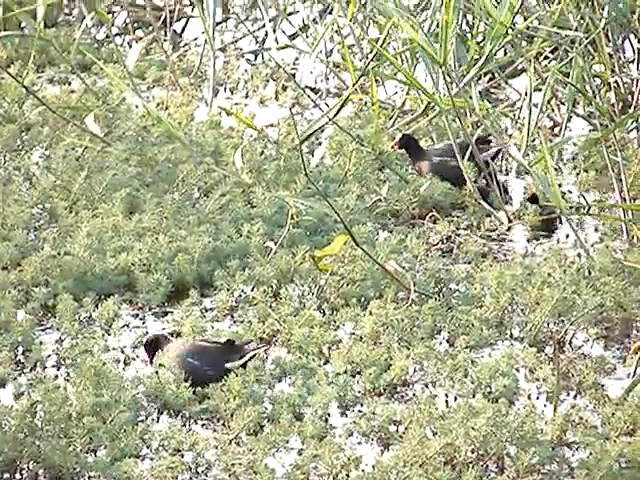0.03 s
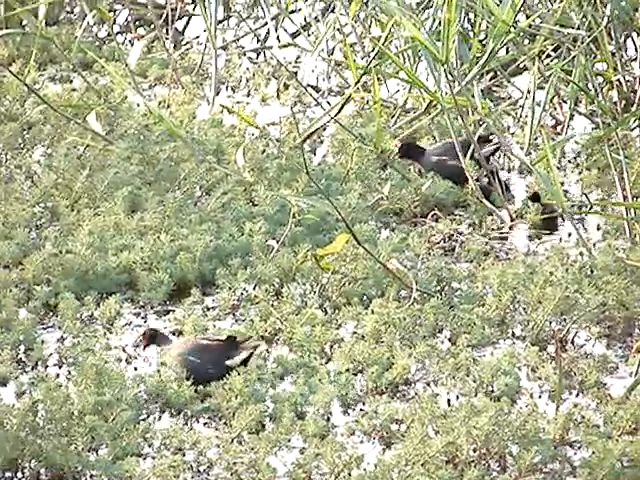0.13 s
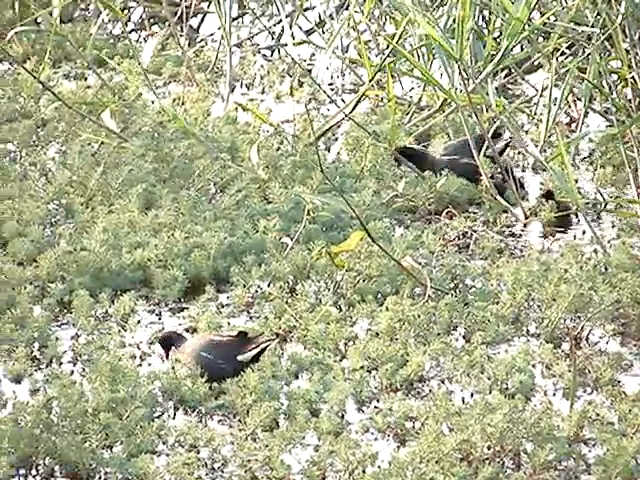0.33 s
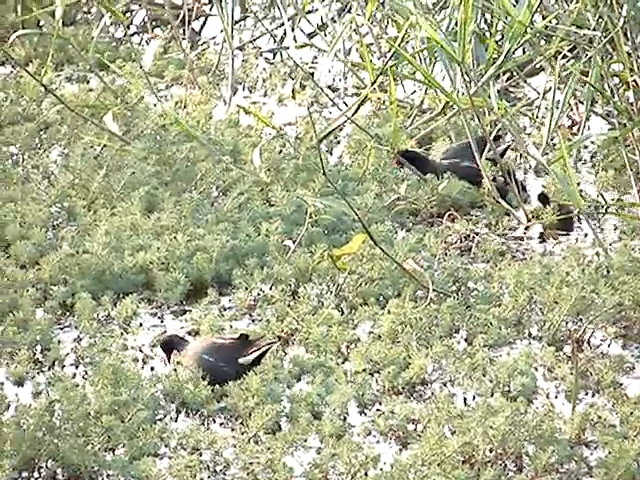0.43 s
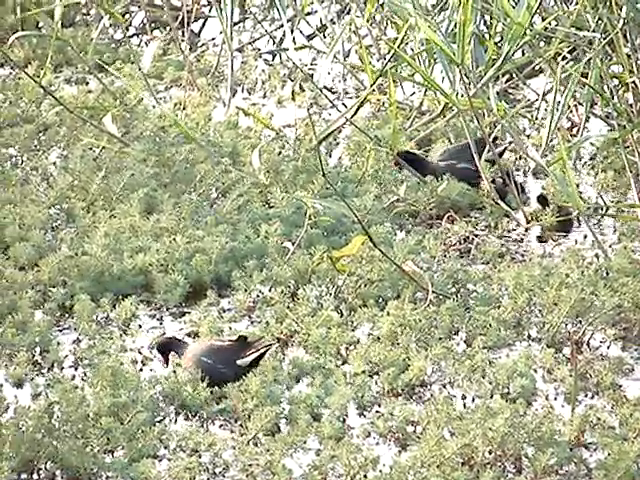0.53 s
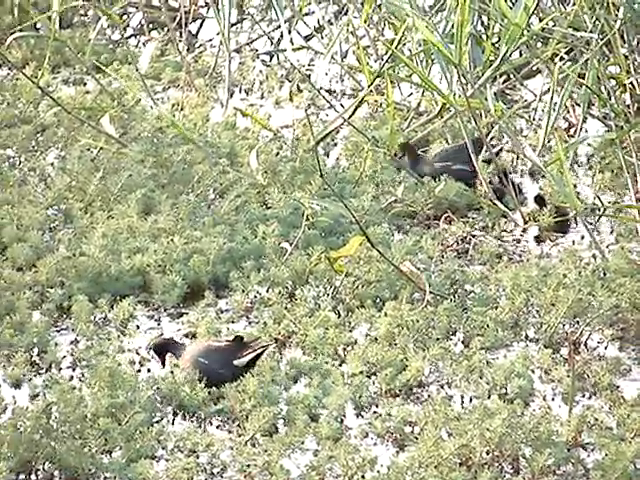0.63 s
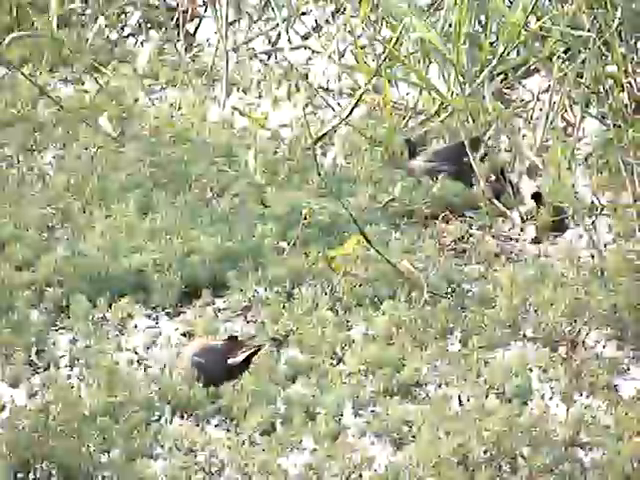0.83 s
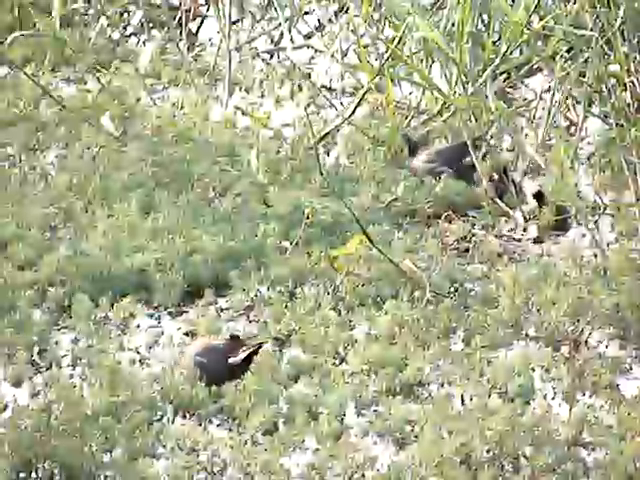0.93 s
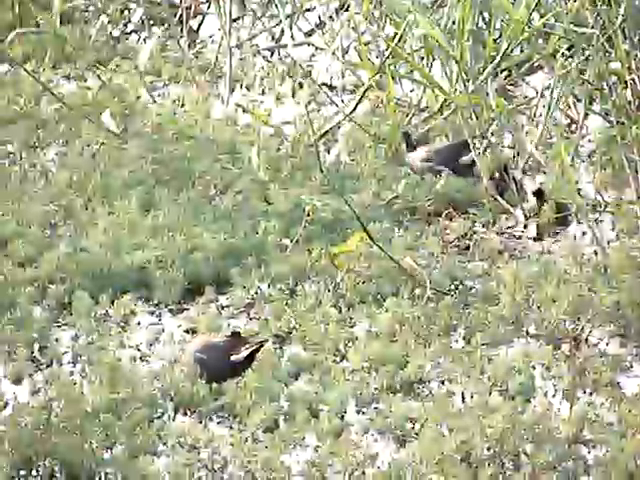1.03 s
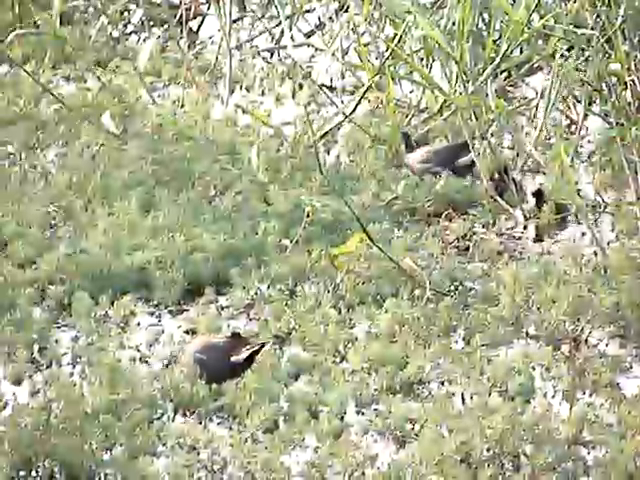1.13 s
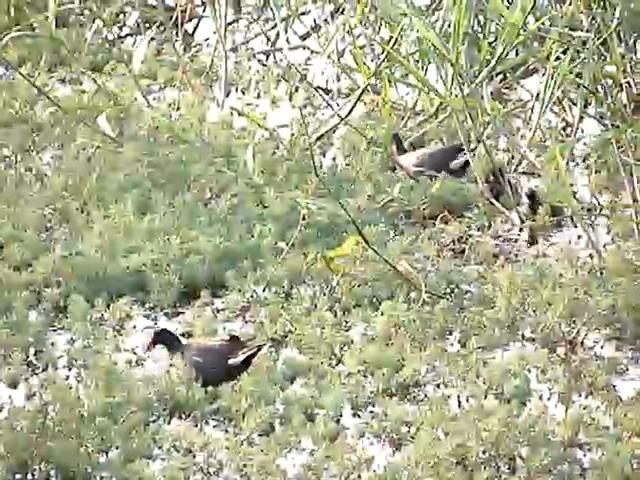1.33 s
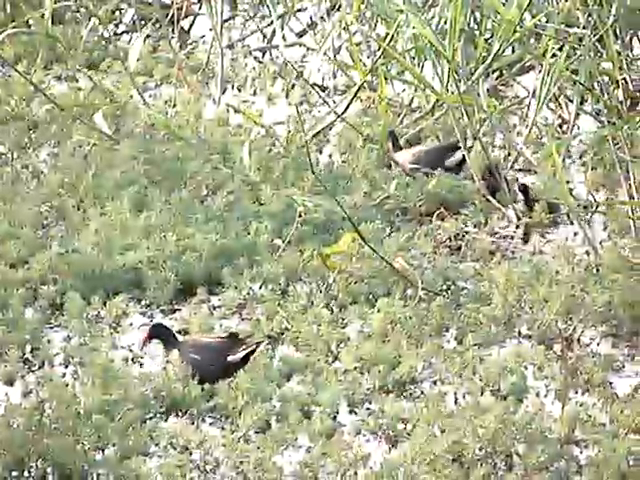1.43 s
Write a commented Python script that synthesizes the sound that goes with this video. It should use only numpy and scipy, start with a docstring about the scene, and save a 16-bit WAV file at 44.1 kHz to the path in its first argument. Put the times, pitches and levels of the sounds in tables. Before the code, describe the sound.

One sharp, raspy call from a marsh bird rings out and leaves soft echoes. Behind it lie steady far-off noise, an insect-like hiss and a faint gliding whine, while low wind rumble gradually builds on the microphone.

```python
"""Moorhen at the marsh edge

A moorhen gives one short, harsh call, a jittery voice shaped by its throat and bill. It carries
two dull overload thumps, and reeds and far banks throw it back. Behind it lie distant outdoor noise,
a low drone, an insect-like hiss and a faint gliding whine. A breeze begins to buffet the microphone."""
import sys
import numpy as np
from scipy import signal
from scipy.fft import rfft, irfft
from scipy.io import wavfile
from scipy.ndimage import uniform_filter1d

SR = 44100
rng = np.random.default_rng(int(sys.argv[2]) if len(sys.argv) > 2 else 0)


def master(y):
    """Save y as 16-bit WAV."""
    cut = np.clip(np.atleast_2d(y).T, -1, 1)
    pcm = np.round(cut * 32767)  # scale
    wavfile.write(sys.argv[1], SR, pcm.astype(np.int16))


N = 66150
t = np.arange(N) / SR
BIN_HZ = np.arange(N // 2 + 1) * SR / N


def undb(db):
    """Decibels to gain."""
    return 10 ** (np.asarray(db) / 20)


def unit(x):
    """Scale to rms 1."""
    return x / np.sqrt(np.mean(x ** 2) + 1e-20)


def curve(rows, column=1):
    """Join (seconds, value, ..) rows by straight lines."""
    rows = np.array(rows)
    return np.interp(t, rows[:, 0], rows[:, column])


def gain_at(hz, eq):
    """Gain of a (Hz, dB) EQ curve at the given frequencies."""
    eq = np.array(eq)
    return undb(np.interp(np.log(np.maximum(hz, 1)), np.log(eq[:, 0]), eq[:, 1]))


def colour(x, eq):
    """Filter by a (Hz, dB) EQ curve."""
    return irfft(rfft(x) * gain_at(BIN_HZ, eq), N)


def noise(spectrum):
    """Noise of rms 1 with a (Hz, dB) spectrum."""
    return unit(colour(rng.standard_normal(N), spectrum))


def wander(rate_hz):
    """Smooth random modulation of rms 1."""
    width = max(int(SR / rate_hz), 1)
    return unit(uniform_filter1d(uniform_filter1d(rng.standard_normal(N), width), width))


def gate(start, end, fade_s):
    """Open between two times, with soft edges."""
    return np.clip(np.minimum(t - start, end - t) / fade_s + 1, 0, 1)


# The outdoor bed. Each row: frequency in Hz, relative level in dB.
AIR_SPECTRUM = [(25, 4), (110, -17.5), (175, -1), (260, -2), (400, -3), (520, -1.5), (630, -3), (790, 1),
                (900, -2.5), (1050, -3), (1140, 0.5), (1290, -7), (1480, -2.5), (1650, -7.5), (1830, -5),
                (2300, -12), (2600, -14.5), (3300, -16.5), (6500, -21.5), (10500, -29)]
AIR_DB, AIR_WAVER_DB = -48, 0.3

def distant_air():
    """A bed of far-off outdoor noise that barely wavers."""
    return noise(AIR_SPECTRUM) * undb(AIR_DB + AIR_WAVER_DB * wander(18))


DRONE_HZ, DRONE_DRIFT_HZ, DRONE_DB = 163.6, 5.45, -57

def drone():
    """A faint, distant low tone with an unsteady pitch."""
    hz = DRONE_HZ + DRONE_DRIFT_HZ * wander(17.1)
    return undb(DRONE_DB) * np.sin(2 * np.pi * np.cumsum(hz) / SR)


# Two bright bands of hiss. Each row: frequency in Hz, relative level in dB.
HISS_SPECTRUM = [(3700, -37), (4150, -26), (4450, -10), (4800, -3), (5170, 3.5), (5550, -9), (6100, -9),
                 (6900, -30.5), (7700, -18), (8500, -8.5), (9150, -3), (9800, -9.5), (10400, -20)]
HISS_DB, HISS_FLICKER_DB = -45.5, 1.27

def insect_hiss():
    """A high, insect-like hiss with a fast flicker."""
    return noise(HISS_SPECTRUM) * undb(HISS_DB + HISS_FLICKER_DB * wander(130))


# The whine, one list per glide. Each row: time in seconds, pitch in Hz, level in dB.
WHINE_GLIDES = [
    [(.42, 4130, -66), (.46, 4040, -48.5), (.53, 3960, -59.5)],
    [(.65, 4580, -58), (.69, 4100, -60), (.8, 3330, -59)],
    [(.72, 3993, -60), (.82, 4223, -52), (1.12, 4200, -53)],
    [(1.1, 4450, -54), (1.17, 3940, -59.5), (1.21, 3560, -64), (1.29, 3150, -72)],
]
WHINE_WAVER, WHINE_GRAIN = .006, .9

def whine():
    """A thin, grainy tone that glides, holds and falls away."""
    out = 0
    for glide in WHINE_GLIDES:
        hz = curve(glide) * (1 + WHINE_WAVER * wander(300))
        phase = 2 * np.pi * np.cumsum(hz) / SR
        tone = np.sin(phase) * (1 + WHINE_GRAIN * wander(180))
        tone += np.cos(phase) * WHINE_GRAIN * wander(180)
        envelope = undb(curve(glide, 2)) * gate(glide[0][0], glide[-1][0], fade_s=.022)
        out = out + unit(tone) / np.sqrt(2) * envelope
    return out


# Wind rumble. Each row: frequency in Hz, relative level in dB.
WIND_SPECTRUM = [(20, -12.5), (50, 0), (90, 2), (130, -5.5), (200, -9.5), (300, -16), (600, -41),
                 (1500, -75.5)]
# The swell of the breeze. Each row: time in seconds, level in dB.
WIND_SWELL = [(0, -71), (.4, -61), (.48, -46.5), (.57, -46.5), (.7, -47.5), (.92, -43.5), (1.02, -41.5),
              (1.1, -45), (1.2, -44), (1.28, -40.5), (1.34, -40.5), (1.5, -47.5)]
# Single buffets. Each row: peak time in seconds, level in dB.
WIND_BUFFETS = [(.758, -35), (0.999, -37), (1.04, -34.5), (1.169, -33.5), (1.243, -35), (1.397, -29.5),
                (1.492, -35.5)]
BUFFET_WIDTH_S, BUFFET_HZ, BUFFET_ROUGH_DB = 0.0096, 94.1, -13

def wind():
    """Air on the microphone: a growing rumble with short, ragged buffets."""
    out = noise(WIND_SPECTRUM) * undb(curve(WIND_SWELL) + 1.4 * wander(25))
    ragged = undb(BUFFET_ROUGH_DB) * noise([(60, -22), (180, 3), (350, -3), (700, -31), (2000, -68)])
    for peak, db in WIND_BUFFETS:
        hz = BUFFET_HZ * (1 + .3 * wander(154))
        eddy = np.cos(2 * np.pi * np.cumsum(hz) / SR)
        envelope = undb(db) * np.exp(-((t - peak) / BUFFET_WIDTH_S) ** 2 / 2)
        out += envelope * (eddy + ragged)
    return out


def scatter(delay, decay_s):
    """Scattered reflections: a delayed, decaying noise impulse response of energy 1."""
    response = rng.standard_normal(N) * (t >= delay) * np.exp(-np.abs(t - delay) / decay_s)
    return unit(response) / np.sqrt(N)


# EQ of the reverb tail. Each row: frequency in Hz, gain in dB.
TAIL_EQ = [(1100, -3), (2300, 4.5), (3400, 1.5)]
TAIL_DB, TAIL_T60_S, TAIL_DELAY_S = -24.5, 0.82, 0.024

def reed_tail(call):
    """The reeds scatter the call into a thin reverb tail."""
    response = scatter(TAIL_DELAY_S, TAIL_T60_S / np.log(1000))
    return undb(TAIL_DB) * signal.fftconvolve(colour(call, TAIL_EQ), response)[:N]


# Echo taps. Each row: delay in seconds, level at 2 kHz in dB, tilt in dB per octave.
ECHO_TAPS = [(.06, -29, 1.5), (.113, -31, 3.5), (.175, -40, 2), (.225, -34, -6), (.277, -23, -5),
             (0.301, -33.5, -6), (.372, -30.5, -3.5), (.452, -35.5, -5.5)]
ECHO_SMEAR_S, ECHO_SCATTER = 0.014, 0.82

def marsh_echoes(call):
    """Reeds and far banks return separate echoes, each a clean tap with a short smear."""
    octaves = np.log2(np.clip(BIN_HZ, 1000, 4000) / 2000)
    out = 0
    for delay, db, tilt in ECHO_TAPS:
        response = ECHO_SCATTER * scatter(delay, ECHO_SMEAR_S)
        response[int(delay * SR)] += 1
        echo = signal.fftconvolve(call, response)[:N] / np.hypot(1, ECHO_SCATTER)
        out = out + irfft(rfft(echo) * undb(db + tilt * octaves), N)
    return out


# Thumps placed at the height of the call. Each row: start in seconds, level in dB before filtering.
OVERLOAD_THUMPS = [(0.2245, -23), (0.236, -27.5)]
THUMP_DECAY_S, THUMP_BAND_HZ = 0.00076, (20, 920)

def overload_thumps():
    """Two brief, dull low thumps, the sound of a recorder overloading on the loud call."""
    pulses = sum(undb(db) * (t > start) * np.exp(-np.abs(t - start) / THUMP_DECAY_S)
                 for start, db in OVERLOAD_THUMPS)
    return signal.sosfilt(signal.butter(1, THUMP_BAND_HZ, "band", fs=SR, output="sos"), pulses)


# A high squeak breaks into the full note, which arches and sags. Each row: time in seconds, pitch in Hz.
CALL_PITCH = [(.204, 1149), (.2075, 1281), (.2098, 1256), (.2112, 1118), (.219, 1158), (.229, 1147),
              (.235, 1124), (.242, 1078), (.257, 1014)]
# The push behind the call, weak on the squeak. Each row: time in seconds, level in dB.
CALL_EFFORT = [(.203, -51), (.2062, -26.5), (.2085, -21), (.2102, -28), (.2118, -12), (.227, -11.5),
               (.238, -12.5), (.2482, -15.5), (.2502, -19.5), (.2535, -23.5), (.259, -38.5)]
# Resonances of throat and bill. Each row: frequency in Hz, gain in dB.
THROAT_EQ = [(1030, -10), (1170, -10), (2150, -7.5), (2480, -9.5), (3150, 0), (3450, -0.5), (3800, -4),
             (4300, -19.5), (5700, -34), (7000, -40), (9200, -33.5), (10500, -38.5)]
# Rasp between the harmonics. Each row: frequency in Hz, relative level in dB.
RASP_SPECTRUM = [(100, -19.5), (500, -17), (1100, -3), (2300, 5), (3400, -2), (4300, -13), (5700, 0.5),
                 (7200, -30), (10000, -28)]
JITTER, SHIMMER_DB, FLUTTER_HZ, RASP_DB = 0.0078, 0.8, 824, -33
SOFT_BELOW_DB, SOFT_TILT = -9.5, 0.21  # a soft voice dulls: dB per octave for each dB of effort
THROAT_LAG_RAD = 0.38  # higher harmonics trail the lower ones
LIMITER_DIP_DB, LIMITER_DIP_S = -5, .0004
RATTLE_START_S, RATTLE_RISE_S, RATTLE_DB, RATTLE_HZ = .2355, .004, 1.5, 190

def moorhen():
    """A jittery voice through the throat resonances; it rasps and rattles out."""
    hz = curve(CALL_PITCH) * (1 + JITTER * wander(FLUTTER_HZ))
    phase = 2 * np.pi * np.cumsum(hz) / SR
    rattle_age = t - RATTLE_START_S
    rattle_depth = RATTLE_DB * np.clip(rattle_age / RATTLE_RISE_S, 0, 1)
    effort_db = curve(CALL_EFFORT) + rattle_depth * np.sin(2 * np.pi * RATTLE_HZ * rattle_age)
    tilt = SOFT_TILT * np.minimum(effort_db - SOFT_BELOW_DB, 0)
    voice = 0
    for k in range(1, 9):
        gain = gain_at(k * hz, THROAT_EQ) * undb(tilt * np.log2(k) + SHIMMER_DB * wander(FLUTTER_HZ))
        voice = voice + gain * np.cos(k * phase - THROAT_LAG_RAD * k ** 2)
    rasp = undb(RASP_DB) * noise(RASP_SPECTRUM) * (1 + np.cos(phase))  # one puff per cycle
    # the level dips briefly at each overload thump
    dips_db = sum(LIMITER_DIP_DB * np.exp(-np.abs(t - at) / LIMITER_DIP_S) for at, _ in OVERLOAD_THUMPS)
    envelope = undb(effort_db + dips_db) * gate(CALL_EFFORT[0][0], CALL_EFFORT[-1][0], fade_s=.001)
    return (voice + rasp) * envelope


def scene():
    """The call and its reflections over the marsh ambience, in mono."""
    call = moorhen()
    foreground = call + overload_thumps() + reed_tail(call) + marsh_echoes(call)
    ambience = distant_air() + insect_hiss() + drone() + wind() + whine()
    return (ambience + foreground)[None]


HIGH_CUT_HZ = 9950

def record(dry):
    """A steep high cut on the whole mix."""
    return signal.sosfilt(signal.ellip(10, .2, 70, HIGH_CUT_HZ, fs=SR, output="sos"), dry)


dry = scene()
out = record(dry)
master(out)
```